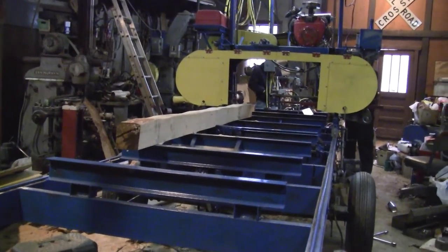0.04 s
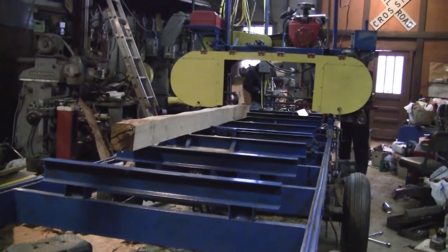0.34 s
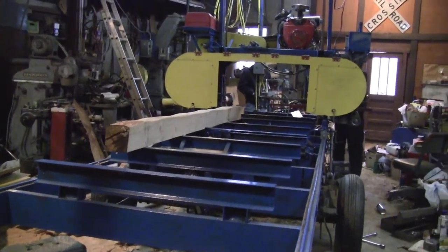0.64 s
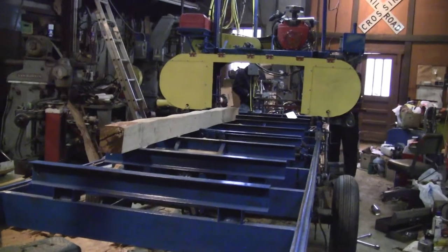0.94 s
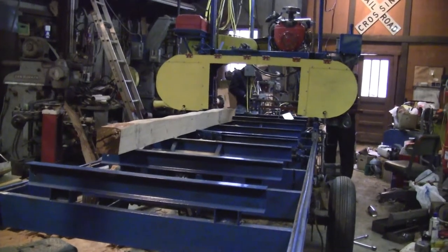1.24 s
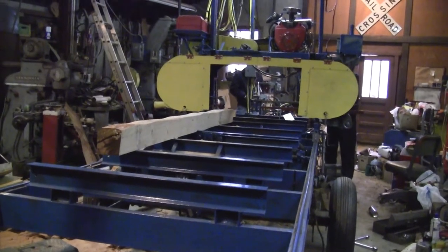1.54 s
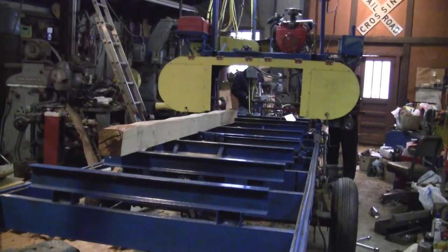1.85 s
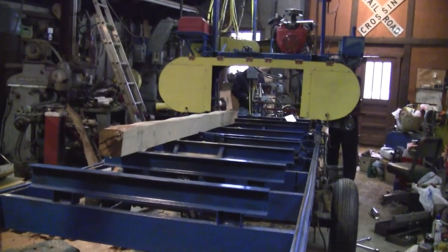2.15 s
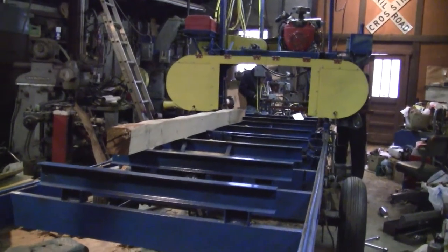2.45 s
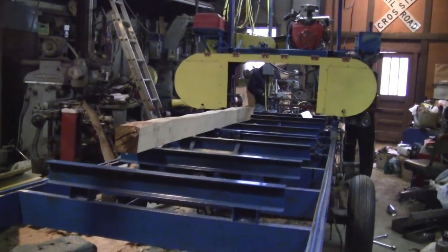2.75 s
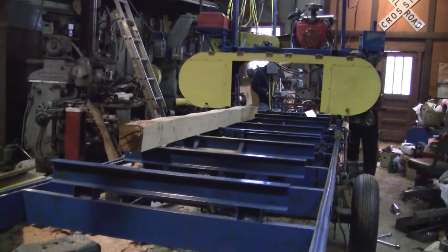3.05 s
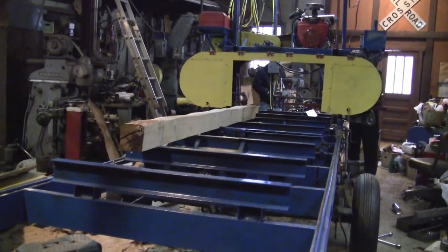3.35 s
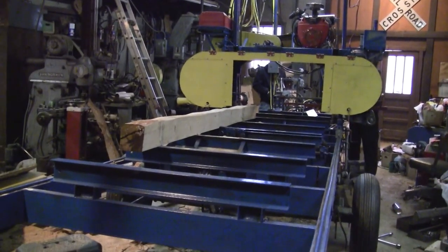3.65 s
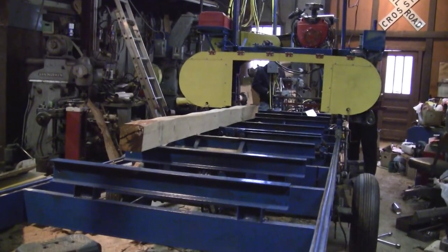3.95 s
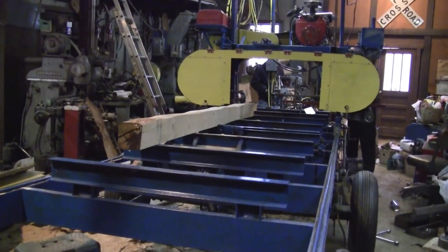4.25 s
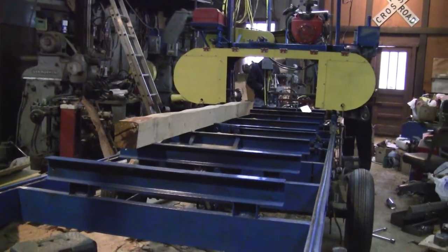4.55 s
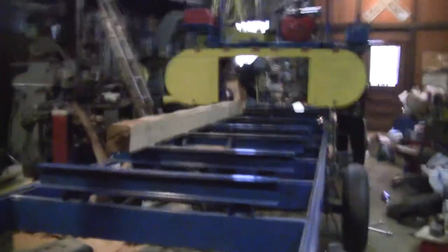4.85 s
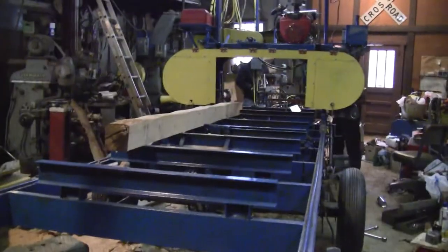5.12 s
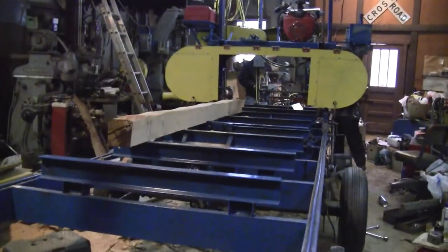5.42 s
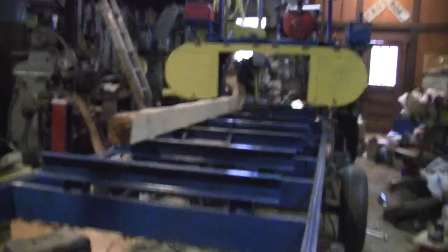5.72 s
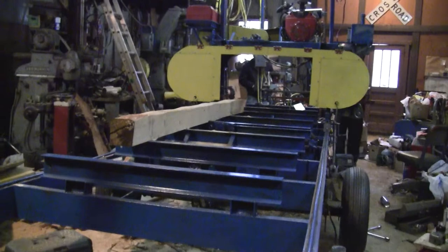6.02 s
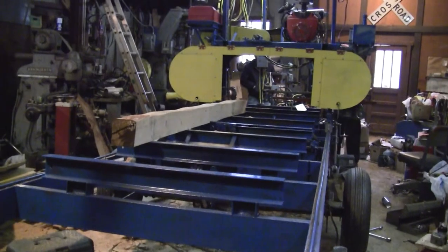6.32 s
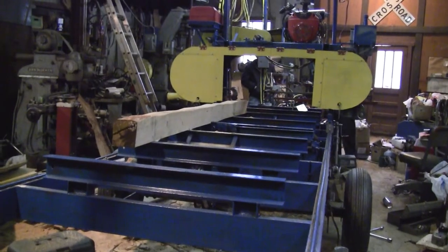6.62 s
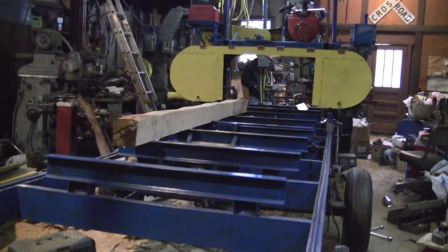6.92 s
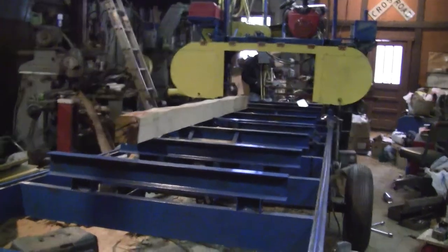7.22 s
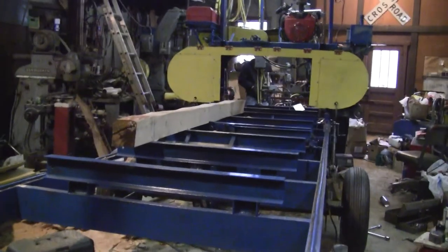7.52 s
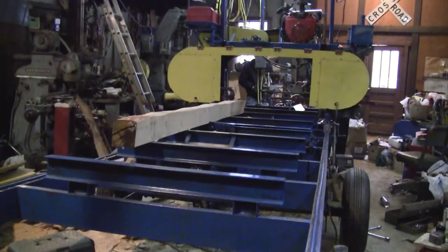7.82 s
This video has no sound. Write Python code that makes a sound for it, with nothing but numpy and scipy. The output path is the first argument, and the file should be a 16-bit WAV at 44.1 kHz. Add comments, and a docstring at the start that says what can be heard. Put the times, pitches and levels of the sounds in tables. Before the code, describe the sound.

Heard from the far end of a slightly reverberant workshop, a two-cylinder petrol engine on a sawmill takes two tries to start. Each try opens with a metallic clank and whining, grinding starter gears. The first dies away; the second brings the engine to life. It then clatters on unevenly, rasping as it speeds up and booming as it slows, with scattered pops from the exhaust.

```python
"""Twin-cylinder sawmill engine, cold start

A petrol engine on a band sawmill, heard from the far end of a workshop. The starter clanks in,
grinds through a few weak firings and spins down; at the second try the engine catches.
Cold, it hunts: it rasps as the throttle opens, then booms and pops as it shuts."""
import sys
import numpy as np
from scipy import signal
from scipy.fft import rfft, irfft, next_fast_len
from scipy.io import wavfile
from scipy.ndimage import uniform_filter1d

SR = 44100
rng = np.random.default_rng(int(sys.argv[2]) if len(sys.argv) > 2 else 0)


def generate_wav(signal):
    """Clip the signal to [-1, 1] and save it as 16-bit WAV at the path in sys.argv[1]."""
    frames = np.transpose(np.atleast_2d(signal))
    scaled = np.clip(frames, -1, 1) * 32767
    pcm = np.round(scaled).astype(np.int16)
    wavfile.write(sys.argv[1], SR, pcm)


N = 355887
TIME = np.arange(N) / SR


def amp(db):
    """Decibels to gain."""
    return 10 ** (np.asarray(db) / 20)


def unit(x):
    """Scales to rms 1."""
    return x / np.sqrt(np.mean(x ** 2) + 1e-20)


def curve_at(points, hz):
    """Interpolates on a log-frequency axis."""
    f, value = np.transpose(points)
    return np.interp(np.log(hz + 1), np.log(f + 1), value)


def lift_db(modes, hz):
    """Boost that resonances add at hz."""
    return sum(db / (1 + (2 * (hz - f) / width) ** 2) for f, width, db in modes)


def drift(hz):
    """Smooth random motion of rms 1, rolling off above hz."""
    size = next_fast_len(N, real=True)
    lowpass = np.exp(-(np.fft.rfftfreq(size, 1 / SR) / hz) ** 2)
    return unit(irfft(rfft(rng.standard_normal(size)) * lowpass, size)[:N])


def gate(start_s, length_s, rise_s, fade_s):
    """Linear rise, hold, exponential fade."""
    fade = np.exp(-np.maximum(TIME - start_s - length_s, 0) / fade_s)
    return np.clip((TIME - start_s) / rise_s, 0, 1) * fade


def add_burst(mix, start_s, db, t60_s):
    """Mixes in one decaying noise burst."""
    burst = rng.standard_normal(SR) * amp(db - 60 * TIME[:SR] / t60_s)
    part = mix[round(start_s * SR):][:SR]
    part += burst[:len(part)]


def strokes(turns, spread_db):
    """One click per whole turn, with random spread in strength."""
    clicks = np.diff(np.floor(turns), prepend=np.floor(turns[0]))
    return clicks * amp(spread_db * np.clip(rng.standard_normal(N), -2, 2))


def puffs(clicks, decay_s, grain_db):
    """Each click releases a dying puff of gritty noise."""
    envelope = signal.lfilter([1], [1, -np.exp(-1 / (decay_s * SR))], clicks)
    return envelope * unit(rng.standard_normal(N) * amp(grain_db * drift(1070)))


def colour(x, spectrum, modes=(), size=16384):
    """Minimum-phase filter of energy 1: a broad spectrum plus resonances."""
    hz = np.fft.rfftfreq(size, 1 / SR)
    db = curve_at(spectrum, hz) + lift_db(modes, hz)
    log_gain = np.log(amp(np.r_[db, db[-2:0:-1]]))
    taps = np.fft.ifft(np.exp(np.conj(signal.hilbert(log_gain)))).real[:size // 2]
    return signal.oaconvolve(x, taps / np.linalg.norm(taps))[:N]


# Room decay. Each row: frequency in Hz, t60 in seconds.
ROOM_DECAY = [(100, 1), (500, 0.8), (3000, 0.69), (8000, 0.38), (16000, 0.2)]
# Stereo width of the reflections. Each row: frequency in Hz, side minus mid in dB.
ROOM_WIDTH = [(60, -72), (150, -90), (380, -19), (950, -21.5), (2380, -15.5), (5980, -10.5), (15000, 3)]

def workshop(x, wet_db, spacing=20):
    """Direct sound plus dense reflections, wide only in the treble. Returns (mid, side)."""
    taps = np.zeros((2, SR // 2))
    arrivals = np.arange(5 * spacing, SR // 2 - spacing, spacing)
    arrivals = arrivals + rng.integers(0, spacing, (2, len(arrivals)))
    np.put_along_axis(taps, arrivals, rng.choice([-1., 1.], arrivals.shape), 1)
    hz, t, bands = signal.stft(taps, SR, nperseg=256)
    bands *= amp(-60 * t / curve_at(ROOM_DECAY, hz)[:, None])
    bands[1] *= amp(curve_at(ROOM_WIDTH, hz))[:, None]
    paths = signal.istft(bands, SR)[1]
    paths /= np.linalg.norm(paths[0])
    paths[0] *= amp(wet_db)
    paths[0, 0] += 1  # direct sound
    paths[0] /= np.linalg.norm(paths[0])
    return signal.oaconvolve(x[None], paths, axes=1)[:, :N]


def radiate(x, spectrum, modes=(), *, wet_db, spots=1, block=100):
    """Coloured sound leaves from random spots, each with its own room paths. Mid has rms 1."""
    spot = rng.integers(0, spots, N // block + 1).repeat(block)[:N]
    pair = sum(workshop(colour(x * (spot == k), spectrum, modes), wet_db) for k in range(spots))
    return pair / pair[0].std()


# Background spectrum. Each row: frequency in Hz, density in dB.
ROOM_TONE_SPECTRUM = [(15, -60), (25, -30), (48, -31), (60, -17), (81, -8.5), (90, -17), (103, -14),
                      (243, -12), (286, -9.5), (383, -13.5), (573, -10.5), (673, -13), (856, -8.5),
                      (2850, -28.5), (15000, -49)]

def room_tone():
    """Faint, steady noise of the shop."""
    return amp(-52.5) * radiate(rng.standard_normal(N), ROOM_TONE_SPECTRUM, wet_db=-12.5)


# Pinion blows and run-down ticks. Each row: start in seconds, level in dB, t60 in seconds.
PINION_CLANKS = [(.655, -48.5, 0.66), (.705, -28, .2), (0.715, -11.5, 0.15), (0.725, -11.5, 0.11),
                 (2.112, -40, 0.46), (2.428, -24, 0.23), (2.438, -9.5, 0.22)]
PINION_TICKS = [(1.46, -42, .04), (1.576, -46, .04), (1.74, -41, 0.23), (1.875, -43, .025),
                (2.115, -58, 0.32), (2.276, -61, 0.022), (2.33, -61.5, .025)]
# Blow and tooth-scrape spectra. Each row: frequency in Hz, density in dB.
CLANK_SPECTRUM = [(25, -47), (120, -23), (300, 4.5), (600, -1), (1100, 12), (1800, 7.5), (2500, 1.5),
                  (4000, 0), (6000, -4), (9500, -5.5), (12000, -19), (16000, -31)]
SCRAPE_SPECTRUM = [(300, -62), (1800, -1.5), (3200, -0.5), (6500, -2), (9500, -3.5), (12000, -16.5),
                   (16000, -35)]
# Gear resonances. Each row: centre in Hz, width in Hz, lift in dB.
GEAR_MODES = [(415, 58, 7.6), (775, 210, 7.2), (990, 100, 3.2), (1350, 140, 1.2), (1622, 120, 6.6),
              (1745, 13, 13.6), (2720, 42, 3), (4040, 120, 10), (4470, 160, 6.1), (4960, 92, 9.6),
              (5550, 190, 5.8), (5920, 220, 6.4), (7360, 340, 6.4), (8420, 210, 3.2), (8650, 310, 8.1),
              (10700, 530, 5)]

def pinion():
    """The pinion strikes the ring gear or drops back, ringing the flywheel; it ticks running down."""
    blows, ticks = np.zeros((2, N))
    for track, hits in (blows, PINION_CLANKS), (ticks, PINION_TICKS):
        for start_s, db, t60_s in hits:
            add_burst(track, start_s, db, t60_s)
    clanks = colour(blows, CLANK_SPECTRUM, GEAR_MODES)
    return workshop(clanks + colour(ticks, SCRAPE_SPECTRUM), wet_db=-8)


# Key turns. Each row: start and hold in seconds, then air, growl, extra initial growl and scrape in dB.
KEY_TURNS = [(0.718, 0.54, -32.5, -21, 4.5, -19.5), (2.446, 0.88, -39.5, -25, 10.5, -20)]
# Pumped-air and gear-growl spectra. Each row: frequency in Hz, density in dB.
CHUFF_SPECTRUM = [(25, -26), (50, -25), (80, -20), (125, -2.5), (170, -3), (250, -2.5), (400, -1),
                  (900, -8), (3000, -68)]
GROWL_SPECTRUM = [(25, -62), (140, -31.5), (300, -2), (600, -2), (1200, 7), (2000, -2.5), (3000, -5.5),
                  (5000, -14.5), (16000, -43.5)]

def starter(tooth_hz=430, labour_hz=15, motor_db_per_s=-34.5, pump_db_per_s=-23):
    """Teeth grind on the ring gear while the pistons pump air; key released, the motor coasts down."""
    teeth = strokes(np.cumsum(tooth_hz * (1 + 0.15 * drift(200))) / SR, spread_db=7)
    labour_turns = np.cumsum(labour_hz * (1 + 0.25 * drift(5.2))) / SR
    labour = amp(2 * np.sin(2 * np.pi * labour_turns))
    grind = labour * puffs(teeth, decay_s=0.0016, grain_db=3.5)
    chuff = radiate(labour * rng.standard_normal(N), CHUFF_SPECTRUM, wet_db=-4)
    growl = radiate(grind, GROWL_SPECTRUM, GEAR_MODES, wet_db=-1.5, spots=3)
    meshed_scrape = radiate(grind, SCRAPE_SPECTRUM, GEAR_MODES, wet_db=3.5, spots=2)
    free_scrape = amp(-8) * radiate(grind, SCRAPE_SPECTRUM, wet_db=18, spots=2)
    out = np.zeros((2, N))
    for start_s, held_s, air_db, growl_db, heave_db, scrape_db in KEY_TURNS:
        age_s, coast_s = np.maximum(TIME - start_s, 0), np.maximum(TIME - start_s - held_s, 0)
        onset = np.clip(age_s / 0.038, 0, 1)
        heave = amp(heave_db * np.exp(-age_s / 0.18))  # forcing the engine into motion
        slowness = np.maximum(1 - age_s / 0.28, 0)
        in_mesh = gate(start_s, held_s, rise_s=0.033, fade_s=0.072)
        out += chuff * onset * amp(air_db + pump_db_per_s * coast_s)
        out += (growl * heave + free_scrape) * onset * amp(growl_db + motor_db_per_s * coast_s)
        out += meshed_scrape * in_mesh * amp(scrape_db - 17 * slowness)
    return out


# Starter gear tones. Each row: peak time in seconds, pitch in Hz, half length in seconds, level in dB.
GEAR_TONES = [(0.866, 1260, 0.045, -20), (.996, 8400, .033, -19), (1.208, 5550, 0.041, -20),
              (1.947, 415, .035, -40), (2.506, 1768, 0.032, -19), (2.684, 5600, 0.1, -21.5),
              (2.953, 950, .12, -25.5), (3.015, 1700, .1, -22), (3.077, 4280, 0.15, -24)]

def gear_song(waver_depth=0.025):
    """Starter gears, briefly driven to sing, swell into wavering tones and die away."""
    out = np.zeros(N)
    for peak_s, hz, half_s, db in GEAR_TONES:
        t = np.arange(max(peak_s - 3 * half_s, 0), peak_s + 3 * half_s, 1 / SR)
        smoothing = int(SR / (4 * waver_depth * hz))
        waver = unit(uniform_filter1d(rng.standard_normal(SR), smoothing))[:len(t)]
        tone = np.sin(2 * np.pi * np.cumsum(hz * (1 + waver_depth * waver)) / SR)
        swell = np.exp(-((t - peak_s) / half_s) ** 2)
        out[round(t[0] * SR):][:len(t)] += amp(db) * swell * tone
    return workshop(out, wet_db=-3)


# Exhaust spectrum. Each row: frequency in Hz, density in dB.
BOOM_SPECTRUM = [(20, -38), (45, -21.5), (68, -16), (92, -9), (125, -1.5), (200, 0), (320, -1), (450, -8.5),
                 (900, -20), (3000, -76)]
# Muffler resonances. Each row: centre in Hz, width in Hz, lift in dB.
MUFFLER_MODES = [(66, 11, 6), (133.7, 21, 9.5), (165.4, 11.4, 1.5), (197, 22, 5.5), (260.5, 18, 8.5)]

def exhaust_boom(firings):
    """Firings drive the muffler; combustion starts ragged and grows cleaner."""
    ragged = np.interp(TIME, (3.3, 6.5), (0.9, 0.38))
    gas = unit(firings) + ragged * unit(puffs(firings, decay_s=0.047, grain_db=-0.5))
    return radiate(gas / np.hypot(1, ragged), BOOM_SPECTRUM, MUFFLER_MODES, wet_db=-11)


# Pipe resonances. Each row: engine order, centre in Hz, half width in Hz, level in dB.
PIPE_MODES = [(8, 199, 7, -2.5), (13, 312, 10, -7), (5, 126, 9, -8), (6, 131, 7, -6), (8, 167, 5, -2)]

def pipe_drone(cycle_hz, turns):
    """Single engine orders boom as they sweep through exhaust resonances."""
    tone = np.zeros(N)
    for order, hz, half_width_hz, db in PIPE_MODES:
        response = 1 / (1 + ((order * cycle_hz - hz) / half_width_hz) ** 2)
        tone += response * amp(db + drift(7.1)) * np.sin(2 * np.pi * order * turns)
    return workshop(tone, wet_db=-12.5)


# Clatter spectrum. Each row: frequency in Hz, density in dB.
CLATTER_SPECTRUM = [(60, -48), (200, -5), (380, -1.5), (530, -4.5), (800, -2.5), (1300, -2), (2000, -7),
                    (3000, -9.5), (6000, -18.5), (9000, -18), (16000, -65)]
# Block resonances. Each row: centre in Hz, width in Hz, lift in dB.
BLOCK_MODES = [(641, 100, 4.7), (762, 65, 5.7), (1000, 61, 0.91), (1240, 73, 1.9), (1720, 47, 2.6),
               (1976, 22, 1.2)]

def block_clatter(firings, valves):
    """Valves and firings knock on the engine block."""
    knocks = unit(puffs(valves + 0.72 * firings, decay_s=0.0059, grain_db=5.5)) + 0.55 * unit(firings)
    return radiate(knocks, CLATTER_SPECTRUM, BLOCK_MODES, wet_db=3, spots=5)


# Rasp spectrum. Each row: frequency in Hz, density in dB.
RASP_SPECTRUM = [(200, -20.5), (900, -8.5), (2000, 0.5), (3500, -4.5), (5500, 1.5), (7500, 0.5),
                 (9700, 0.5), (11500, -6.5), (13500, -14.5), (16000, -21.5)]
# Shroud resonances. Each row: centre in Hz, width in Hz, lift in dB.
SHROUD_MODES = [(3474, 280, 5.6), (3770, 1200, 3.9), (4460, 480, 2.9), (5900, 210, 0.38), (6560, 78, 0.77),
                (8800, 1400, 2.2)]

def gas_rasp(firings, valves):
    """Each firing and valve stroke releases a short jet of gas."""
    pulses = (firings + 0.28 * valves) * amp(0.54 * drift(22))
    jets = puffs(pulses, decay_s=0.0043, grain_db=2)
    return radiate(jets, RASP_SPECTRUM, SHROUD_MODES, wet_db=7, spots=4)


# Block resonance that swells the whine. Each row: centre in Hz, width in Hz, lift in dB.
WHINE_MODES = [(733, 30, 13)]

def gear_whine(cycle_hz, turns, teeth_per_cycle=40):
    """Gear teeth sing on the overrun, louder at speed, and fall quiet under load."""
    overrun = np.clip(0.5 - np.gradient(cycle_hz) * SR / 12, 0.08, 1)
    fade_in = np.interp(TIME, (3.2, 4.4), (0, 1))
    level = amp(-26.5 + lift_db(WHINE_MODES, teeth_per_cycle * cycle_hz) + 2 * drift(22))
    gain = overrun * fade_in * (cycle_hz / cycle_hz.max()) ** 2 * level
    return workshop(gain * np.sin(2 * np.pi * teeth_per_cycle * turns), wet_db=-8)


# Throttle openings. Each row: start, length and rise in seconds, rasp level in dB.
THROTTLE_OPENINGS = [(3.17, 0.63, 0.047, -18), (4.224, .06, 0.033, -18), (4.357, 0.44, 0.012, -18),
                     (5.154, 0.039, 0.023, -22), (5.364, 0.097, 0.013, -21.5), (5.526, 0.19, 0.027, -18),
                     (5.762, 0.63, 0.015, -18.5), (6.627, 0.34, 0.24, -24), (7.155, 0.044, .01, -19.5),
                     (7.248, .54, 0.015, -19.5)]
# Unburnt fuel rumbling in the muffler. Each row: start and length in seconds, boom and clatter in dB.
MUFFLER_BURNS = [(4.128, .12, -38, -16.5), (5.13, 0.18, -40, -21.5), (5.283, 0.13, -25.5, -18.5),
                 (6.58, 0.44, -25, -22), (7.002, 0.13, -22, -16.5), (7.958, .13, -25, -19.5)]

def engine_gains(catch_s=3.09, boom_db_per_s=1.38, clatter_db_per_s=-0.44, idle_rasp_db=-28.5):
    """Boom, drone, clatter and rasp follow the false start, warm-up, throttle and afterburning."""
    age_s = np.maximum(TIME - catch_s, 0)
    running = np.clip(age_s / 0.088, 0, 1)
    throttle = np.max([amp(db) * gate(start_s, length_s, rise_s, fade_s=0.088)
                       for start_s, length_s, rise_s, db in THROTTLE_OPENINGS], axis=0)
    false_start = amp(-34) * gate(start_s=0.99, length_s=0.19, rise_s=0.044, fade_s=0.05)
    boom = running * amp(-33 + boom_db_per_s * age_s) + false_start
    clatter = running * amp(-22 + clatter_db_per_s * age_s + 1.5 * throttle / throttle.max())
    rasp = np.hypot(throttle, running * amp(idle_rasp_db))
    drone_over_boom_db = -3
    for start_s, length_s, boom_db, clatter_db in MUFFLER_BURNS:
        burn = gate(start_s, length_s, rise_s=0.045, fade_s=0.028)
        shaking = gate(start_s, length_s, rise_s=0.14, fade_s=0.028)
        boom = np.hypot(boom, amp(boom_db) * burn)
        clatter = np.hypot(clatter, amp(clatter_db) * shaking)
        drone_over_boom_db += 4 * burn
    return boom, boom * amp(drone_over_boom_db), clatter, rasp


# Engine speed. Each row: time in seconds, four-stroke cycles per second.
GOVERNOR_HUNT = [(3.1, 11), (3.6, 21.5), (3.87, 25.9), (4.1, 22.7), (4.4, 20), (4.6, 22), (4.86, 26.6),
                 (5.14, 22.9), (5.27, 22.6), (5.52, 18.5), (5.82, 18.3), (6.15, 21.8), (6.43, 26.5),
                 (6.7, 24.5), (6.97, 23.2), (7.27, 20.3), (7.52, 21.5), (7.83, 26.6), (8.07, 24.5)]

def engine():
    """Two cylinders fire unevenly, valves working in between, while the governor hunts."""
    cycle_hz = uniform_filter1d(np.interp(TIME, *np.transpose(GOVERNOR_HUNT)), size=3000)
    turns = np.cumsum(cycle_hz * (1 + 0.002 * drift(25))) / SR  # one per four-stroke cycle
    firings = strokes(turns, spread_db=1) + 0.7 * strokes(turns - 3 / 8, spread_db=1)
    boom_gain, drone_gain, clatter_gain, rasp_gain = engine_gains()
    boom = boom_gain * exhaust_boom(firings)
    valves = sum(strokes(turns - phase, spread_db=0) for phase in (0.13, 0.3, 0.55, 0.68, 0.86))
    clatter = clatter_gain * block_clatter(firings, valves)
    rasp = rasp_gain * gas_rasp(firings, valves)
    drone = drone_gain * pipe_drone(cycle_hz, turns)
    return boom + clatter + rasp + drone + gear_whine(cycle_hz, turns)


# Exhaust pops. Each row: start in seconds, then thump, bark and crack in dB.
EXHAUST_POPS = [(4.229, -26, -17, -9.5), (5.17, -36, -10, -25), (5.377, -25, -12, -34),
                (5.428, -13, -13, -9), (5.531, -24, -9.5, -18), (5.585, -41, -11.5, -35),
                (5.803, -31, -13.5, -16), (6.913, -35, -10.5, -14), (7.116, -8, -12.5, -25),
                (7.154, -6, -23, -10), (7.252, -10, -9, -10)]

def afterfire():
    """Unburnt fuel pops in the muffler: a thump, a bark and a sharp crack."""
    thump, bark, crack = np.zeros((3, N))
    for start_s, thump_db, bark_db, crack_db in EXHAUST_POPS:
        add_burst(thump, start_s, thump_db, t60_s=0.014)
        add_burst(bark, start_s, bark_db, t60_s=0.042)
        add_burst(crack, start_s, crack_db, t60_s=0.02)
    pops = colour(thump, BOOM_SPECTRUM) + colour(bark, CLATTER_SPECTRUM) + colour(crack, RASP_SPECTRUM)
    return workshop(pops, wet_db=-8)


def scene():
    """All sources over the room tone, as left and right."""
    mid, side = room_tone() + starter() + pinion() + gear_song() + engine() + afterfire()
    return np.array([mid + side, mid - side])


def record(dry, cutoff_hz=15850):
    """Full-scale clipping, then a steep low-pass."""
    lowpass = signal.firwin(511, cutoff_hz, window=("kaiser", 9), fs=SR)
    return signal.oaconvolve(np.clip(dry, -1, 1), lowpass[None], "same")


dry = scene()
out = record(dry)
generate_wav(out)
```